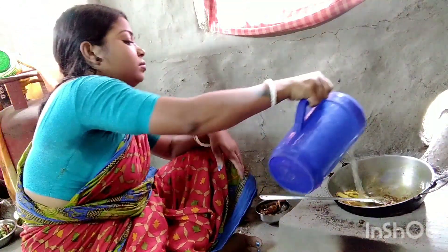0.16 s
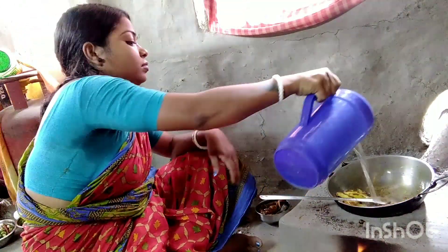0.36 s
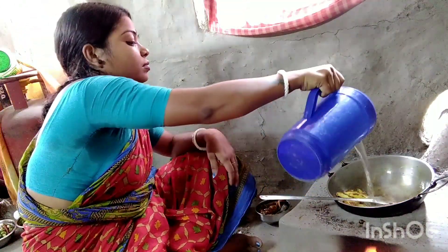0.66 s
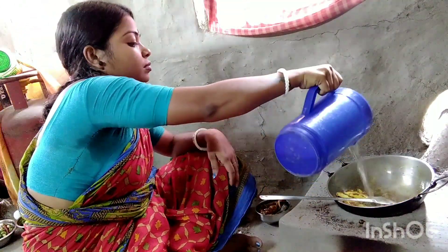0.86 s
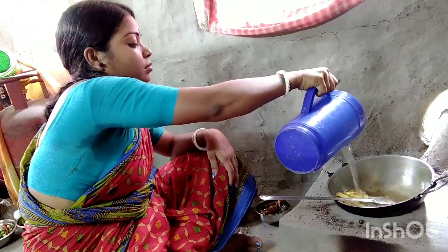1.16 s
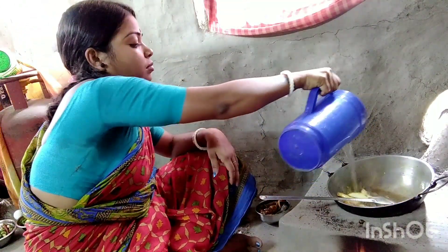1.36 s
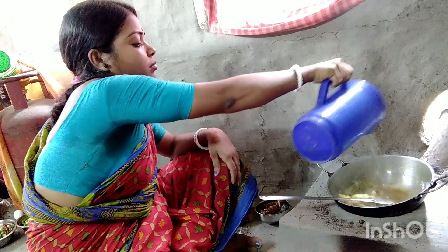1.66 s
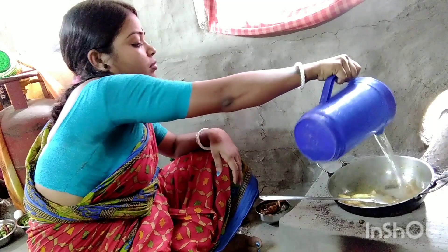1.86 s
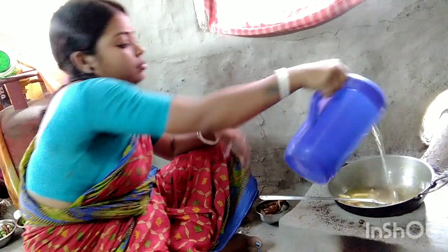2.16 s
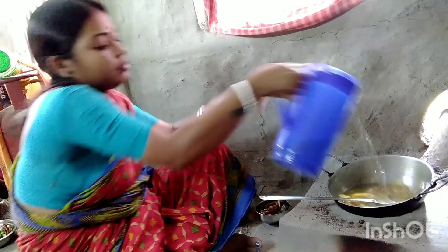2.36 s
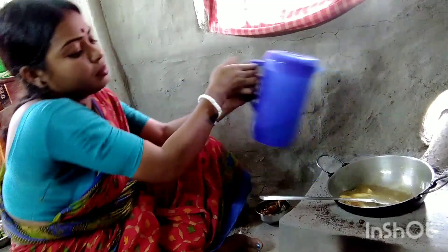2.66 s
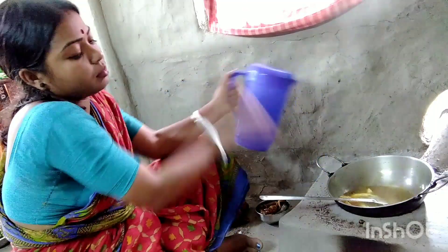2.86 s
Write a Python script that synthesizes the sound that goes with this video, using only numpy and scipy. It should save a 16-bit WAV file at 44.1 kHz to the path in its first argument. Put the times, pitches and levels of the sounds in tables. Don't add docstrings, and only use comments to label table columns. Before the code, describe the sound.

Sizzling pan, close up: softer, dry frying for the first 0.3 s, then poured water lifts it sharply by 0.4 s into a dense, bright hiss, strongest around 1.1-1.6 s. Fat cracks throughout, small splashes come near 0.2-0.5, 1.95 and 2.4 s, tiny bubbles chirp. Hollow pan resonance grows over faint flame rumble. Hiss dips near 1.9 s, briefly recovers at 2.1, then weakens with scattered spits until 3 s.

```python
import sys
import numpy as np
from scipy import signal
from scipy.fft import rfft, irfft
from scipy.io import wavfile
from scipy.ndimage import uniform_filter1d

SR = 44100
rng = np.random.default_rng(int(sys.argv[2]) if len(sys.argv) > 2 else 0)


def transcribe(signal):
    frames = np.atleast_2d(signal).T
    limited = np.clip(frames, -1, 1)
    pcm = np.round(limited * 32767).astype(np.int16)
    wavfile.write(sys.argv[1], SR, pcm)


def how_loud(loudness_db):
    steps = np.asarray(loudness_db, float) / 20
    return 10 ** steps


N = 132300
TIME = np.arange(N) / SR

# time in seconds, level in dB.
BOIL_LEVEL = [(0, -40.5), (0.25, -39.8), (0.32, -34.8), (0.39, -30.4), (0.49, -31.8), (0.57, -30.1),
              (1.15, -29.0), (1.28, -30.0), (1.47, -29.0), (1.66, -29.8), (1.72, -32.0), (1.9, -33.0),
              (2.14, -30.9), (2.36, -35.4), (2.46, -35.9), (2.565, -39.5), (2.61, -35.9), (3, -39.0)]
PORT_LAG_S = 2.1e-4
FILL_DB_PER_S = 1.63


def curve(table):
    return np.interp(TIME, *np.array(table).T)


def shape(x, gain):
    return irfft(rfft(x) * gain(np.arange(N // 2 + 1) * SR / N + 1e-3), N)


def ring(hz, width):
    return lambda f: 1j * f * width / (hz ** 2 - f ** 2 + 1j * f * width)


def unit(x):
    return x / np.sqrt(np.mean(x ** 2))


def walk(rate):
    hold = int(SR / rate)
    steps = np.repeat(rng.standard_normal(N // hold + 1), hold)
    return 1.47 * uniform_filter1d(uniform_filter1d(steps, hold), hold)[:N]


def flutter(rate):
    w = walk(rate)
    return w - uniform_filter1d(w, size=int(3 * SR / rate))


def bursts():
    bursts_per_s, scatter_db = 22000, 1.84
    there = rng.random(N) < bursts_per_s / SR
    sign = np.sign(rng.standard_normal(N))
    return unit(there * sign * how_loud(scatter_db * rng.exponential(size=N)))


def both(shared, alike):
    late = shape(shared, lambda f: np.exp(-2j * np.pi * f * PORT_LAG_S))
    alone = np.array([bursts(), bursts()])
    return np.sqrt(alike) * np.array([late, shared]) + np.sqrt(1 - alike) * alone


def sizzle():
    # frequency in Hz, density in dB per Hz.
    colour = np.array([(500, -27.5), (900, -24), (1600, -11.5), (2600, -14), (4200, -7.5), (6500, -4),
                       (9000, -6), (14000, -13.5)])
    level_db, alike_hz = -33.5, 1850
    low_follow = 1
    swell_db, flicker_high_db, flicker_low_db, quick_db = .2, .9, 2.6, .65
    dry_hz, dry_db, wet_s, drown_db_per_s = 3200, 4, .3, .9

    boil, swell = curve(BOIL_LEVEL), flutter(16)
    calm = uniform_filter1d(boil, size=9000)
    sparse = 0.5 - .06 * (boil + 30)
    dryness_db = dry_db * np.clip((wet_s - TIME) / 0.098, 0, 1) - drown_db_per_s * (TIME - 1.5)
    out = 0
    for hz in 500 * 2 ** np.arange(0, 5, .5):
        pair = both(bursts(), 1 / (1 + (hz / alike_hz) ** 4))
        high = min(hz / 6500, 1)
        db = np.interp(np.log(hz), np.log(colour[:, 0]), colour[:, 1])
        db = db + high * (boil + 30) + (1 - high) * low_follow * (calm + 30)
        db = db + np.exp(-np.log2(hz / dry_hz) ** 2 / .5) * dryness_db
        db = db + (1 - high) ** 2 * FILL_DB_PER_S * (TIME - 1.5)
        flicker_db = flicker_low_db + high * (flicker_high_db - flicker_low_db)
        db = db + sparse * (swell_db * swell + flicker_db * flutter(7 + 8 * high))
        db = db + quick_db * walk(45)
        band = ring(hz, 0.59 * hz)
        out = out + how_loud(db) * shape(pair, lambda f: band(f) ** 2)
    return how_loud(level_db) * unit(out)


def spits():
    # peak time in seconds, peak level in dB.
    cracks = [(.097, -25), (.423, -19), (.862, -19), (1.214, -17), (1.462, -17), (1.478, -19), (1.665, -18),
              (2.467, -23), (2.617, -21), (2.692, -23), (2.787, -21), (2.855, -19)]
    # peak time in seconds, peak level in dB, pitch in Hz.
    slaps = [
        (0.1724, -37.5, 2960),
        (0.3311, -34.5, 2870),
        (0.478, -30.5, 3700),
        (1.9505, -34.5, 3230),
        (2.4194, -43, 4050),
    ]
    crackles_per_s, crackle_db, crackle_s = 55, -41.5, .0017
    crack_s, crack_db, slap_s, slap_db = .002, -11, .013, -2

    def puff(at, s):
        return np.exp(-np.abs(TIME - at) / np.where(TIME > at, s, s / 6))

    there = rng.random(N) < crackles_per_s / SR
    size_db = 2.8 * np.minimum(rng.exponential(size=N), 3)
    pops = there * how_loud(crackle_db + size_db + .5 * (curve(BOIL_LEVEL) + 31))
    loud = signal.lfilter([1], [1, -np.exp(-1 / (crackle_s * SR))], pops)
    loud = loud + sum(how_loud(db + crack_db) * puff(at, crack_s) for at, db in cracks)
    out = loud * unit(shape(rng.standard_normal((2, N)), ring(6800, 4700)))
    noise = rng.standard_normal((2, N))
    for at, db, hz in slaps:
        out = out + how_loud(db + slap_db) * puff(at, slap_s) * unit(shape(noise, ring(hz, .5 * hz)))
    return out


def bubbles():
    per_s, level_db, cycles, glide = 40, -55.5, 10.3, .09
    out, boil = np.zeros(N + 4000), curve(BOIL_LEVEL)
    t = np.arange(4000) / SR
    for at, size, db in rng.random((int(3 * per_s), 3)):
        hz, i = 700 * 6 ** size, int(at * N)
        turns = hz * t * (1 + glide * hz * t / cycles)
        chirp = np.sin(2 * np.pi * turns) * np.exp(-3 * hz * t / cycles)
        out[i:i + 4000] += how_loud(level_db + boil[i] + 30.5 + 10 * db) * chirp
    return np.array([np.roll(out, round(PORT_LAG_S * SR))[:N], out[:N]])


def hollow():
    # frequency in Hz, width in Hz, level in dB, left minus right in dB.
    modes = [(469, 9.9, -41.5, 1), (688, 28, -29.5, 2.5), (809.6, 39, -27.5, 2.5), (1004, 43, -30, -6.5),
             (1323, 49, -27, -11), (1927, 44, -27, -10), (2070, 29, -32.5, -12.5), (2593, 69, -38, 29),
             (3046, 100, -19.5, 1)]
    follow = .7
    out = 0
    for hz, width, db, pan_db in modes:
        tone = unit(shape(both(bursts(), .9 / (1 + (hz / 2600) ** 4)), ring(hz, width)))
        out = out + tone * how_loud(db + 1.54 * walk(6.03) + np.array([[pan_db], [-pan_db]]) / 2)
    calm = uniform_filter1d(curve(BOIL_LEVEL), size=9000)
    return out * how_loud(follow * (calm + 29.5) - 30.5 + FILL_DB_PER_S * (TIME - 1.5))


def walls(x):
    decay_s, level_db, dull_hz = .01, -10, 4000
    tail = rng.standard_normal((2, N)) * np.exp(-TIME / decay_s) * (TIME > .001)
    tail = rfft(tail / np.sqrt(np.sum(tail ** 2, axis=1, keepdims=True)))
    return shape(x, lambda f: 1 + how_loud(level_db) * tail / (1 + (f / dull_hz) ** 4))


def fire():
    # frequency in Hz, density in dB per Hz.
    colour = np.array([(18, -11), (30, -2), (45, 3.5), (58, -5), (85, -2), (118, -13), (270, -10.5),
                       (600, -22)])
    # time in seconds, level in dB.
    flame = [(0, -62), (.12, -51.5), (.6, -54.5), (.8, -59.5), (1.25, -66), (1.35, -53.5), (1.62, -56.5),
             (1.8, -62), (2.3, -61), (3, -58.5)]
    level_db, alike_hz, rumble_hz = -55.5, 420, 110

    def gain(f):
        return how_loud(np.interp(np.log(f), np.log(colour[:, 0]), colour[:, 1], right=-60))

    mid, side = (shape(rng.standard_normal(N), gain) for _ in range(2))
    side = shape(side, lambda f: .09 + 1 / (1 + (alike_hz / f) ** 2.3))
    air = unit(mid + side * np.array([[1], [-1]])) * how_loud(level_db + np.array([[-.5], [.5]]))
    deep = shape(air, lambda f: 1 / (1 + (f / rumble_hz) ** 6) / (1 + (52 / f) ** 6))
    return air - deep + deep * how_loud(curve(flame) + 59 + 0.53 * walk(7.8))


def scene():
    return walls(sizzle() + spits() + bubbles()) + hollow() + fire()


def low_pass(x):
    return signal.sosfilt(signal.butter(12, 15540, fs=SR, output="sos"), x)


def record(dry):
    # whistle in Hz, width in Hz, gain in dB, shoulder in Hz, width in Hz, gain in dB, level in dB.
    ports = [
        (9180, 1980, 11, 11200, 5000, 2.5, -1.5),
        (7090, 994, 10.5, 8580, 2330, 3.5, -1),
    ]
    top_hz = 14255

    def whistle(hz, width, db):
        return lambda f: 1 + (how_loud(db) - 1) * ring(hz, width)(f)

    heard = []
    for x, port in zip(dry, ports):
        main, shoulder = whistle(*port[:3]), whistle(*port[3:6])
        heard.append(how_loud(port[6]) * shape(x, lambda f: main(f) * shoulder(f) * (f < top_hz)))
    heard[0] = shape(heard[0], whistle(1250, 720, -2.4))
    return low_pass(np.array(heard))


dry = scene()
out = record(dry)
transcribe(out)
```